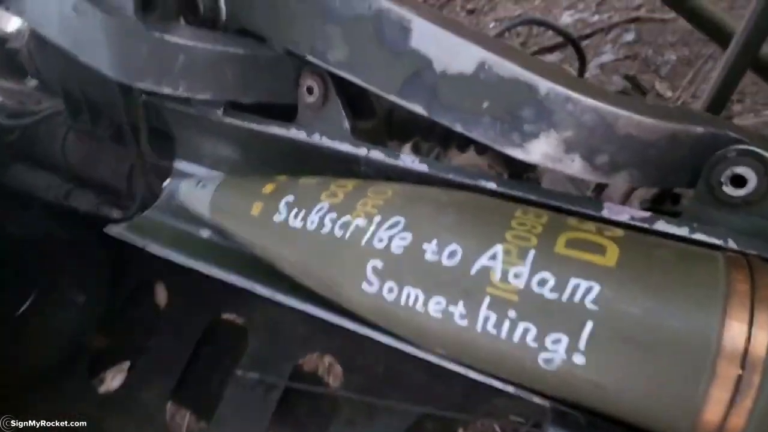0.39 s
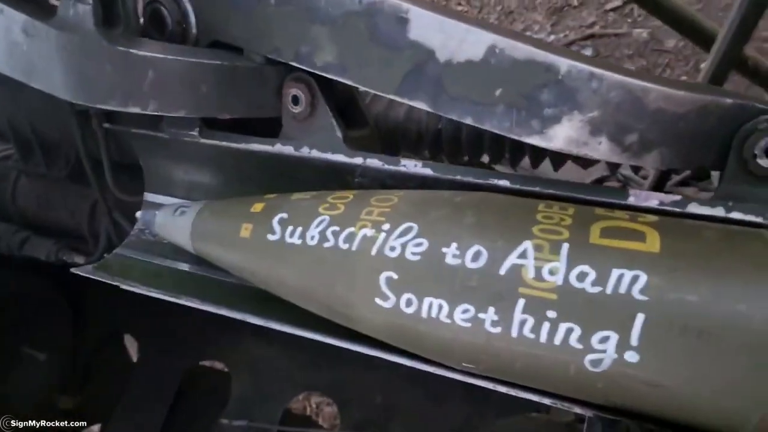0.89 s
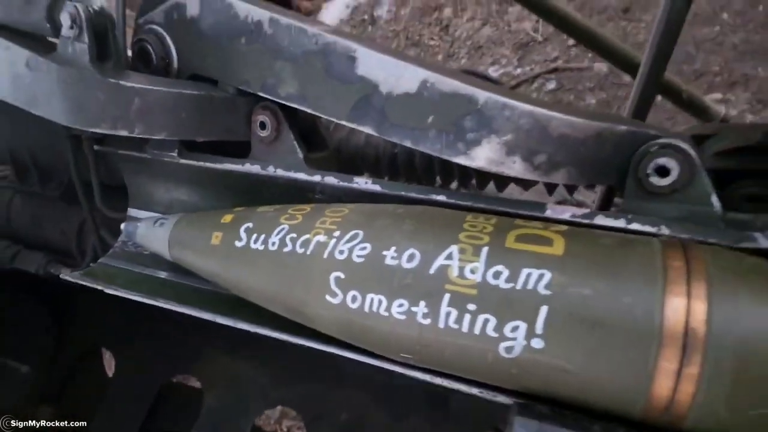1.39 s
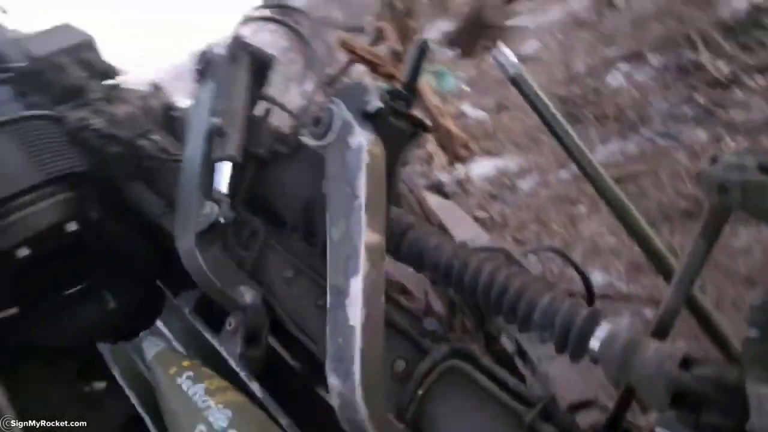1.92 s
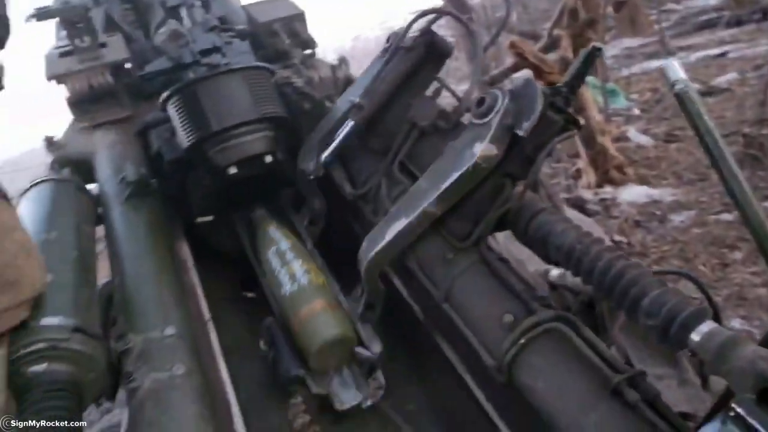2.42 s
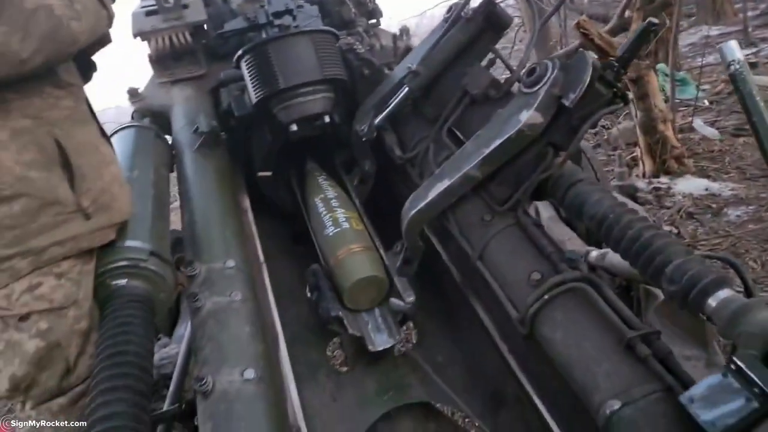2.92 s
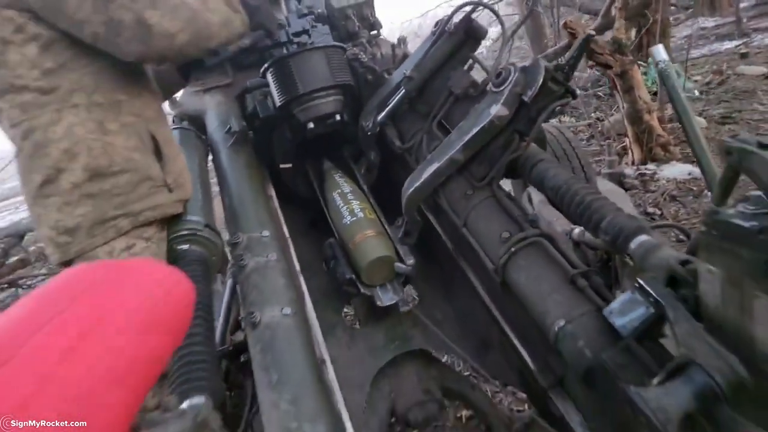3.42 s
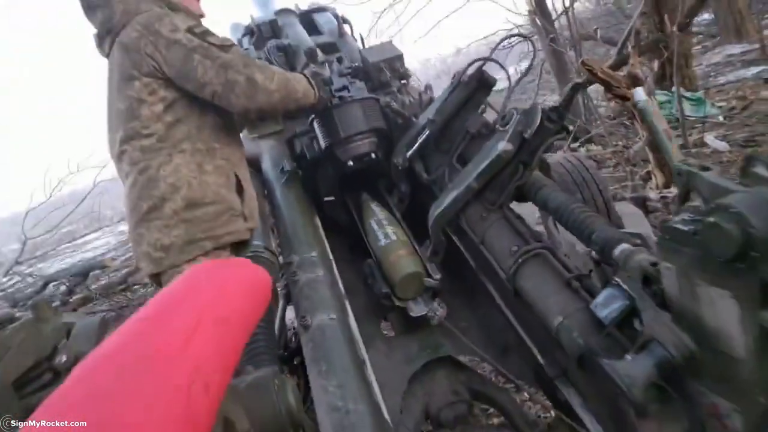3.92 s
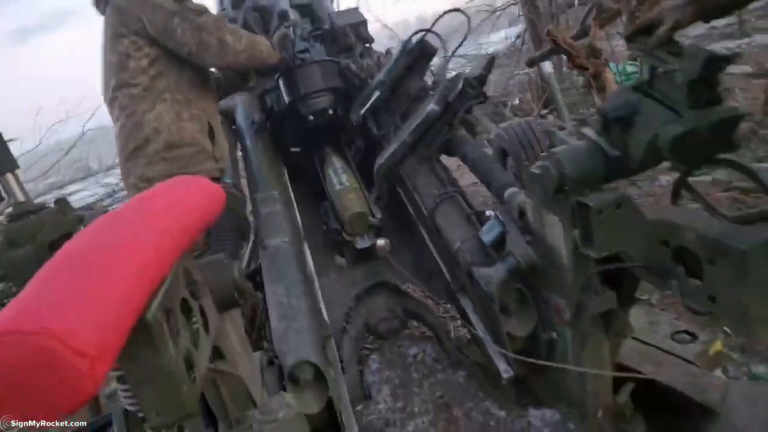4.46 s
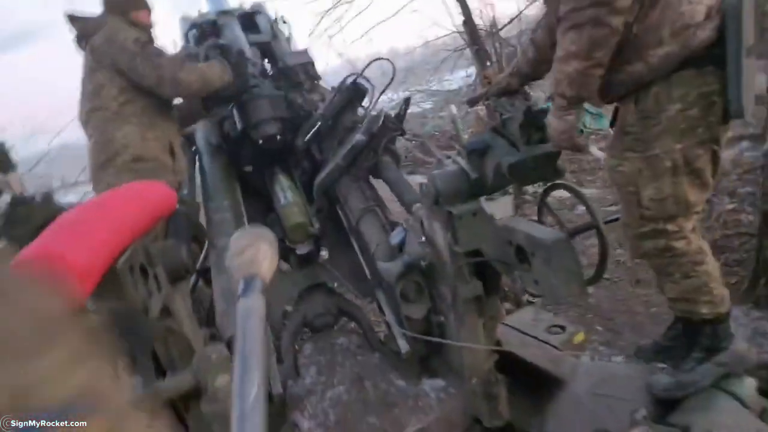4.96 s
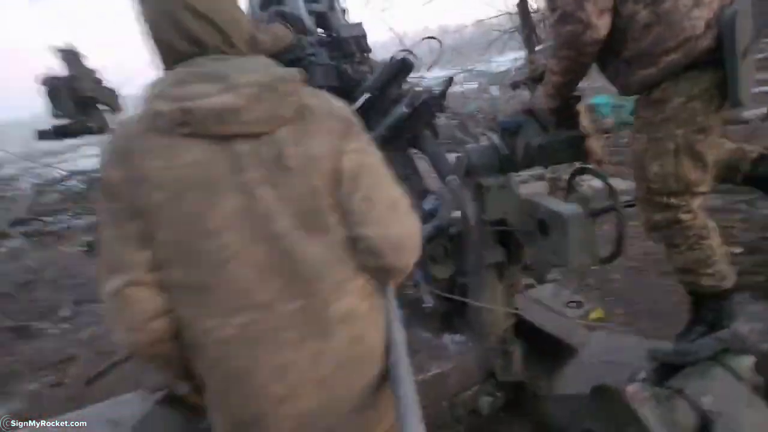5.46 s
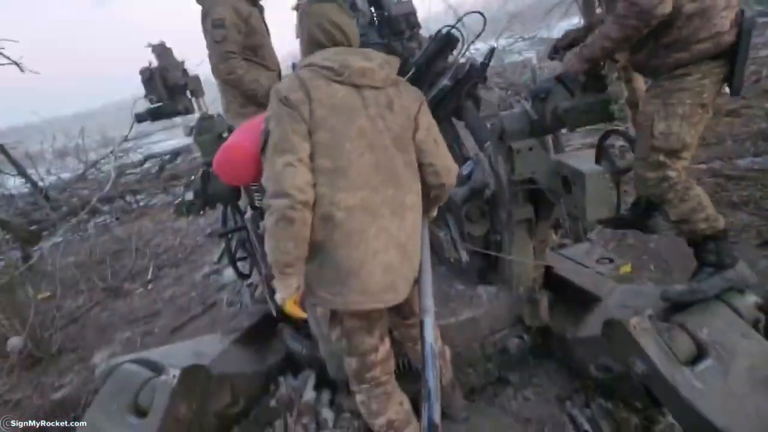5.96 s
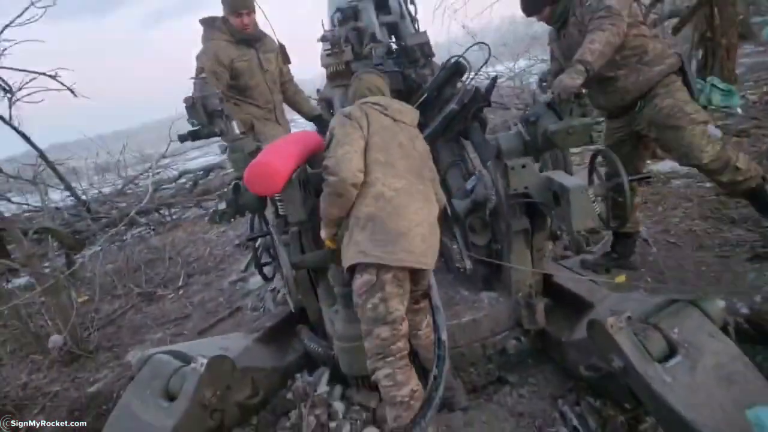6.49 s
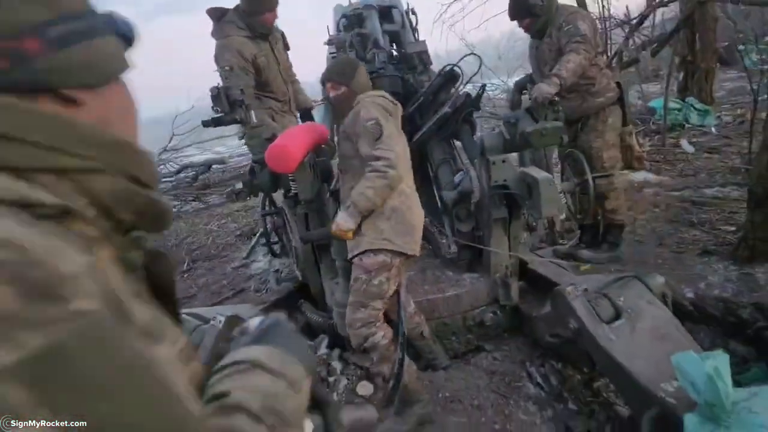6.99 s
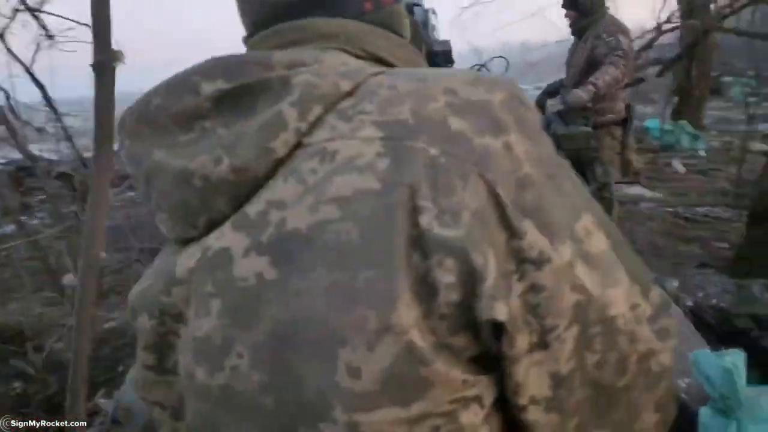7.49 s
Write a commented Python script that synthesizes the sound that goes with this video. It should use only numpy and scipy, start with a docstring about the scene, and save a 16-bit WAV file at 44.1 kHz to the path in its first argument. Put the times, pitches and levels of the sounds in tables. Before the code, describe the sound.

Close outdoor handling of a heavy gun: hollow metal clatter and scraping burst in, then boots crunch, dull knocks land and one late clank rings.

```python
"""Blows ring the steel tray of a field gun outdoors and echo along its open barrel as a heavy shell and gun
parts are handled; parts scrape between blows. The steel is a sum of decaying modes driven by noisy pushes.
Boots crunch on frozen litter (resonant bursts of noise), twigs and a hard tick click dryly (filtered pulses),
dull thumps reach the hand-held phone, a metre or two away, through the hand (sagging sines), and a sleeve
rubs on canvas. Light wind and rustle lie underneath as coloured noise of wavering level."""
import sys
import numpy as np
from scipy import signal
from scipy.fft import rfft, irfft, next_fast_len
from scipy.io import wavfile
from scipy.ndimage import uniform_filter1d

SR = 44100
rng = np.random.default_rng(int(sys.argv[2]) if len(sys.argv) > 2 else 0)


def ratio(d):
    """dB to gain"""
    e = np.asarray(d, float) / 20
    return 10 ** e


def unload_audio(sound):
    """Save the sound as a 16-bit wav file, at the path given as the first command line argument."""
    columns = np.transpose(np.atleast_2d(sound))
    # keep every value between -1 and 1, then stretch to whole-number steps
    steps = np.round(np.clip(columns, -1, 1) * 32767)
    wavfile.write(sys.argv[1], SR, steps.astype(np.int16))


N = 336114

# Modes of tray and shell. Each row: nominal frequency in Hz, relative level in dB, t60 in seconds.
STEEL_MODES = [(373.5, -2.5, 0.16), (455.3, -3.5, 0.12), (505, 2.5, 0.029), (613, 0, 0.07),
               (690, 0.5, 0.06), (739.4, 6, 0.055), (834, 2, 0.055), (936, 10.5, 0.014),
               (1086, -2.5, 0.043), (1298, 0, 0.083), (1525, -5, .07), (1660, -4.5, 0.059),
               (1885, -4.5, 0.072), (2076, -6, 0.14), (2354, -4, .07), (2805, -8, 0.045), (3090, -6, 0.14),
               (3360, -12, 0.088)]
# Modes of the heavy carriage. Each row: nominal frequency in Hz, relative level in dB, t60 in seconds.
CARRIAGE_MODES = [(139, -0.5, 0.15), (182, -3, 0.16), (249.7, -3, 0.084)]
# Spectrum of a crack, the middle band of a burst. Each row: frequency in Hz, relative level in dB per Hz.
CRACK_COLOUR = [(800, -10), (1300, 4.5), (1900, 3.5), (2600, -2), (3100, 1), (4000, -9.5), (5500, -56.5)]
# Spectrum of a sizzle, the treble band of a burst. Each row: frequency in Hz, relative level in dB per Hz.
SIZZLE_COLOUR = [(3000, -14), (4500, -7), (6900, -6), (7600, -6.5), (8600, -9.5), (9900, -17.5),
                 (11500, -12), (15200, -8.5), (16500, -33.5)]


def colour(x, points):
    """Linear filtering: each frequency is scaled by a gain drawn through (Hz, dB) points."""
    size = next_fast_len(x.shape[-1])
    hz, db = np.transpose(points)
    bin_hz = np.arange(size // 2 + 1) * SR / size
    gain = ratio(np.interp(np.log(bin_hz + 1), np.log(hz), db))
    return irfft(rfft(x, size) * gain, size)[..., :x.shape[-1]]


def noise(points):
    """Coloured noise: two uncorrelated signals, mid and side, of joint rms 1."""
    x = colour(rng.standard_normal((2, N)), points)
    return x / x.std()


def walk(rate):
    """Slow random modulation: levels held for 1 / rate seconds and slewed twice, with a spread of 1."""
    hold = int(SR / rate)
    steps = np.repeat(rng.standard_normal(N // hold + 1), hold)
    x = uniform_filter1d(uniform_filter1d(steps, hold), hold)[:N]
    return x / x.std()


def grit(scatter_db, rate):
    """Uneven contact: many small slips make the level jump."""
    return ratio(scatter_db * walk(rate))


def curve(rows):
    """Linear interpolation in time: the columns of a table, one value per sample."""
    s, *columns = np.transpose(rows)
    return [np.interp(np.arange(N) / SR, s, column) for column in columns]


def during(rows):
    """Time gating: 1 while a table lasts, with soft ends."""
    gate = np.interp(np.arange(N) / SR, [rows[0][0], rows[-1][0]], [1, 1], 0, 0)
    return uniform_filter1d(gate, SR // 50)


def fade(t60, rise_s=0.00024):
    """Exponential decay after a quick rise, a third of a second long."""
    t = np.arange(SR // 3) / SR
    return (1 - np.exp(-t / rise_s)) * np.exp(-np.log(1000) * t / max(t60, 1e-3))


def add(out, s, x):
    """Superposition: x is mixed into out from time s."""
    i = int(s * SR)
    n = min(x.shape[-1], N - i)
    out[..., i:i + n] += x[..., :n]


def ring(modes, push, spot_hz=650.0, spot_db=0., detune=0.):
    """Modal response to a push; modes away from the struck spot's pitch lose spot_db per octave."""
    t = np.arange(SR // 6) / SR
    hz, db, t60 = np.transpose(modes)[:, :, None]
    chance = rng.standard_normal((3, len(modes), 1))
    db = db - spot_db * np.abs(np.log2(hz / spot_hz)) + 100 * detune * chance[0]
    hz = hz * (1 + detune * chance[1])  # loose parts load the steel differently every time
    decay = np.exp(-np.log(1000) * t / t60)
    polarity = np.sign(chance[2])
    response = np.sum(polarity * ratio(db) * np.sin(2 * np.pi * hz * t) * decay, axis=0)
    return signal.fftconvolve(push, response[None] / np.abs(response).max(), axes=1)[:, :N]


def air():
    """Turbulence buffets the phone in lumps; cloth friction swishes mid-range and litter rustles above it."""
    # Each row: time in seconds, levels in dB of wind on the phone, cloth swish and fine rustle.
    air_levels = [(0.0, -60, -49, -55.5), (0.53, -46, -57.5, -58), (0.8, -54.5, -62, -63),
                  (1.59, -52.5, -60, -59), (2.0, -41.5, -44, -62.5), (2.45, -53.5, -65.5, -63.5),
                  (2.85, -49, -51, -64), (3.2, -49, -75, -78.5), (3.5, -44, -57.5, -60.5),
                  (3.95, -65.5, -65, -69), (4.33, -43.5, -62, -67.5), (4.6, -56.5, -59.5, -61),
                  (4.8, -41.5, -56.5, -58.5), (5.2, -49.5, -54.5, -58), (5.58, -50.5, -59, -59.5),
                  (5.8, -44.5, -54, -55.5), (6.7, -48, -54.5, -54), (7.15, -50.5, -53.5, -55),
                  (7.62, -45, -58, -59.5)]
    # Spectrum of the wind. Each row: frequency in Hz, relative level in dB per Hz.
    wind_colour = [(18, -25), (30, -1), (80, 4), (150, -1.5), (300, -16.5), (600, -19), (1200, -62.5)]
    # Spectrum of cloth and litter before it is split. Each row: frequency in Hz, relative level in dB per Hz.
    rustle_colour = [(150, -4), (300, 3), (900, -4.5), (1500, -7), (2500, -10), (4000, -16.5), (6500, -15),
                     (8500, -17.5), (10500, -34), (11700, -25.5), (15200, -24), (16500, -37.5)]
    wind_db, swish_db, rustle_db = curve(air_levels)

    # single twigs and folds stand out of the hiss, about 20 a second
    ticks = (rng.random(N) < 20 / SR) * rng.exponential(0.7, N)
    prickle = 1 + signal.fftconvolve(ticks, fade(0.03)[:SR // 10])[:N]
    hiss = noise(rustle_colour) * prickle * ratio(1.0 * walk(31))

    low = colour(hiss, [(500, -7.0), (1200, -32.0)])
    high = colour(hiss, [(2500, -17), (4000, 5.0)])
    middle = hiss - low - high
    swish = low * ratio(1.6 * walk(16)) + middle * ratio(2.2 * walk(9))
    swish = swish / swish.std() * ratio(swish_db)
    wind = noise(wind_colour) * ratio(wind_db + 3.1 * walk(9))
    rustle = high / high.std() * ratio(rustle_db + 1.0 * walk(14))
    return wind + swish + rustle


def crunches():
    """Brittle fracture: grains break in a short dense burst; each heap or kit part has chance resonances."""
    # Boots and kit on frozen litter. Each row: start in seconds, burst level in dB, body level in dB against
    # the burst, body pitch in Hz, sizzle level in dB against the burst.
    footfalls = [(0.02, -24.5, -12, 960, 3), (0.0543, -18, -6, 530, 1.5), (0.2374, -25, -5.5, 570, -7),
                 (0.35, -34, -16, 1300, -6), (0.4808, -53.5, 16, 485, -13), (0.5318, -43, 8.5, 650, -4.5),
                 (0.7, -44.5, 7, 680, 1.5), (1.1208, -47, 4.5, 806, -11), (1.162, -46, -23, 720, 2),
                 (1.271, -53, 13.5, 394, 10), (1.318, -41, -7, 850, -30), (1.455, -91, 33.5, 590, -58),
                 (1.612, -58.5, 22, 395, -24.5), (3.6064, -25, -0.5, 920, 5), (3.7688, -48, 19.5, 386, -33),
                 (3.854, -40, 7, 930, 2), (4.1306, -40, 3, 1080, -4), (4.16, -42.5, 12.5, 930, 0),
                 (4.196, -46.5, 11, 750, -1), (4.2469, -39.5, 11.5, 970, 2), (4.3833, -40.5, 7.5, 477, -5),
                 (4.5592, -53.5, 15, 624, -14), (4.6633, -33.5, 4, 720, 7), (4.682, -35, 4, 600, 7.5),
                 (4.7061, -23, 1.5, 650, 3.5), (4.718, -34.5, 11.5, 710, 6), (5.198, -43, 9, 453, -14),
                 (5.3621, -33.5, 10, 247, 5.5), (5.397, -42.5, 6.5, 544, -31), (5.7995, -53.5, 18, 420, 3),
                 (6.169, -50, 21, 322, -14), (6.315, -27.5, 7.5, 460, -34), (6.8943, -45, 13, 242, -34)]
    soft_t60_s, soft_db, shortening = 0.12, -43.5, 0.2747  # t60 at the soft level; dB of t60 lost per dB above
    out, uneven = np.zeros((2, N)), grit(1.4, 400)
    crack, sizzle = noise(CRACK_COLOUR), noise(SIZZLE_COLOUR)
    for s, db, body_db, body_hz, sizzle_db in footfalls:
        i = int(s * SR)
        span = slice(i, min(i + SR // 4, N))
        t60 = soft_t60_s * ratio(shortening * (soft_db - db))  # a harder crunch is shorter
        envelope = fade(t60) + ratio(-13) * fade(2.8 * t60) + 0.7 * fade(0.015, rise_s=0.001)
        burst = ratio(db - 8.0) * envelope[:span.stop - i] * uneven[span]

        white = rng.standard_normal((2, len(burst)))
        b, a = signal.iirpeak(body_hz, 1.5, fs=SR)
        body = signal.lfilter(b, a, signal.lfilter(b, a, white))
        body = ratio(body_db) * body / body.std()
        grains = burst * (body + crack[:, span] + ratio(sizzle_db) * sizzle[:, span])

        # a short random impulse response gives the chance resonances
        heap = 0.14 * rng.standard_normal(SR // 50) * fade(0.015)[:SR // 50]
        heap[0] = 1
        add(out, s, signal.fftconvolve(grains, heap[None] / np.linalg.norm(heap), axes=1))
    return out


def thumps():
    """Damped oscillation: a soft knock sags in pitch, a little to one side, with a dull scuff on top."""
    # Each row: start in seconds, level in dB, settled pitch in Hz.
    knocks = [(0.057, -23, 136), (0.246, -28, 135), (0.341, -25, 116), (0.376, -29.5, 120),
              (0.552, -30.5, 183), (1.275, -32, 115), (1.61, -17, 130), (1.647, -18, 115.6),
              (3.303, -18.5, 140), (3.608, -29.5, 146), (3.771, -28.5, 225), (4.249, -24, 57),
              (4.383, -32.5, 72), (4.582, -27, 88), (4.779, -25.5, 78.1), (4.946, -21, 83),
              (5.211, -21.5, 105), (5.352, -20, 113), (5.385, -18.5, 83), (5.732, -31, 132),
              (5.833, -23, 142), (5.94, -19, 50.3), (6.015, -19, 91), (6.163, -18, 120), (6.24, -27.5, 281),
              (6.269, -20.5, 138), (6.896, -19, 130)]
    out, scuff, t = np.zeros((2, N)), np.zeros(N), np.arange(SR // 3) / SR
    for s, db, hz in knocks:
        phase = 2 * np.pi * hz * (t + 0.0025 * (1 - np.exp(-t / 0.0016)))
        add(out, s, ratio(db) * np.sin(phase) * fade(0.063, rise_s=0.0046))  # equal in mid and side
        add(scuff, s, ratio(db - 17.5) * fade(0.11, rise_s=0.00082))
    return out + scuff * noise([(90, -23.0), (200, 10.0), (450, -1.5), (900, -42)])


def clicks():
    """Impulsive excitation of a broad resonance: one dry click with a few milliseconds of splinters."""
    # Single dry clicks: twigs and a hard tick among the blows.
    # Each row: start in seconds, peak level in dB, pitch in Hz.
    dry_clicks = [(0.1361, -34, 1900), (0.634, -34, 1960), (1.1625, -29, 11000), (1.272, -35, 11000),
                  (1.574, -30, 8600), (1.828, -8, 7500), (3.8038, -42.5, 1630), (3.823, -38.5, 990),
                  (4.3055, -33.5, 2680), (4.559, -42, 620), (5.317, -33.5, 1320), (5.8174, -35, 950),
                  (6.4874, -31, 2840), (6.59, -33.5, 1170), (7.0235, -24.5, 1470), (7.0988, -75, 1320),
                  (7.185, -34.5, 1400)]
    out = np.zeros((2, N))
    for s, db, hz in dry_clicks:
        push = 0.8 * rng.standard_normal((2, SR // 20)) * fade(0.0027)[:SR // 20]
        push[:, 0] += 1
        b, a = signal.iirpeak(hz, 0.91, fs=SR)
        click = signal.lfilter(b, a, signal.lfilter(b, a, push))
        add(out, s, ratio(db) * click / np.abs(click[0]).max())
    return out


def sleeve():
    """Friction noise: a sleeve of rough cloth drags over canvas in uneven patches."""
    # One list per spell of rubbing. Each row: time in seconds, level in dB.
    spells = [
        [(0.56, -63.5), (0.72, -47), (0.78, -78)],
        [(4.8, -61), (4.92, -52), (5.06, -62.5), (5.17, -49), (5.27, -56), (5.44, -56.5), (5.6, -64.5),
         (5.72, -56), (6.1, -63), (6.5, -53.5), (6.95, -59), (7.62, -65.5)],
    ]
    # Spectrum of the rub. Each row: frequency in Hz, relative level in dB per Hz.
    cloth_colour = [(700, -13), (1200, 1), (1700, 1), (2300, -4), (4500, -20.5)]
    drag = noise(cloth_colour) * grit(1.3, 25) * grit(1.9, 120)
    level = sum(during(rows) * ratio(curve(rows)[0]) for rows in spells)
    return level * drag / drag.std()


def scrape():
    """Stick-slip friction: chatter keeps tray and carriage singing while parts slide."""
    # One list per spell of sliding and rattling. Each row: time in seconds, ring level and hiss level in dB.
    slides = [
        [(1.68, -67.5, -58), (1.73, -45.5, -32.5), (1.81, -42, -41.5), (1.898, -37, -48), (1.978, -39, -50),
         (2.18, -41.5, -43.5), (2.4, -56.5, -78), (2.46, -62.5, -98)],
        [(2.64, -55.5, -19), (2.66, -28, -41), (2.79, -36, -46), (2.825, -45, -60), (3.0, -38, -55),
         (3.12, -56, -79), (3.19, -44.5, -79), (3.28, -55.5, -60.5), (3.33, -31, -45), (3.42, -43, -58),
         (3.56, -81, -88)],
        [(6.62, -47.5, -49), (6.68, -35.5, -50), (6.82, -51, -79)],
    ]
    slips = grit(4.0, 150)
    rub = ring(STEEL_MODES, rng.standard_normal((2, N)) * slips, spot_db=9.0)
    jolts = grit(3.5, 50)
    carriage = ring(CARRIAGE_MODES, rng.standard_normal((2, N)) * jolts)
    hiss = (noise(SIZZLE_COLOUR) + 0.29 * noise(CRACK_COLOUR)) * grit(4.6, 32)
    out = 0
    for rows in slides:
        ring_db, hiss_db = curve(rows)
        singing = ratio(ring_db) * rub / rub.std()
        rumble = ratio(ring_db - 1.5) * carriage / carriage.std()
        out = out + during(rows) * (singing + rumble + ratio(hiss_db) * hiss)
    return out


def barrel(x, s):
    """Air-column echo: sound runs up the open tube and back, narrower and weaker on every round."""
    # The round trip grows longer later on. Each row: time in seconds, round trip in seconds.
    round_trips = [(2.0, 0.04), (3.4, 0.037), (6.7, .044)]
    tube_hz, width_hz, round_db = 740, 200, -9
    lag = int(np.interp(s, *np.transpose(round_trips)) * SR)
    x, out = np.pad(x, ((0, 0), (0, 3 * lag))), 0
    b, a = signal.iirpeak(tube_hz, tube_hz / width_hz, fs=SR)
    for turn in range(3):
        x = signal.lfilter(b, a, np.roll(x, lag, axis=1))
        out = out + ratio(round_db * turn) * x
    return out


def blows():
    """Impact excitation: a sharp push plus chatter rings the steel; a crack on top rings the high modes."""
    # Steel on steel. Each row: start in seconds, ring level in dB, pitch of the struck spot in Hz,
    # crack level and sizzle level in dB against the ring.
    strikes = [(1.72, -24.5, 616, -0.5, -3), (1.742, -11.5, 771, -5.5, -18.5), (1.76, -1, 860, -13, -27.5),
               (1.769, -3, 700, -15, -27), (1.782, -4, 762, -10, -24), (1.788, -9, 880, -17, -30.5),
               (1.828, -8.5, 614, -16, -3.5), (1.852, -14, 638, -5, -20.5), (1.882, -12.5, 591, -1, -25.5),
               (1.899, -0.5, 690, -13, -22.5), (1.916, -15.5, 699, -8, -3.5), (1.977, -28, 424, -0.5, -2),
               (1.995, -26, 720, -26.5, -26), (2.023, -11.5, 793, -19, -28.5),
               (2.074, 0.5, 732, -17.5, -20), (2.177, -24.5, 725, -13, -20.5),
               (2.245, -35, 670, -19, -33.5), (2.286, -25.5, 383, -31.5, -42),
               (2.334, -31, 610, -23.5, -28), (2.392, -34, 580, -21.5, -24.5), (2.647, -4.5, 802, -8, -8.5),
               (2.662, -5, 671, -8.5, -10.5), (2.746, -13.5, 756, -22.5, -32.5),
               (2.762, -16, 1070, -12.5, -20), (2.831, -25.5, 418, -7.5, -23), (2.853, -20, 595, -27, -43),
               (2.883, -10, 897, -31.5, -32.5), (2.968, -14.5, 730, -19, -40),
               (2.997, -26, 345, -34.5, -24), (3.171, -36, 716, -41, -43), (3.199, -32.5, 450, -30, -33.5),
               (3.304, -15, 667, -10.5, 0), (3.342, -21.5, 635, -10.5, -37.5),
               (3.391, -21, 665, -11.5, -32), (6.634, -24, 434, 2, -15), (6.677, -15, 555, -18.5, -33.5),
               (6.685, -3.5, 603, -14, -21.5)]
    # Resonances of small hard parts. Each row: frequency in Hz, width in Hz, level in dB against the bursts.
    small_parts = [(5550, 60, -24), (7500, 45, -22), (13720, 22, -17)]
    into_barrel_db, into_carriage_db = -4, -25  # share of every blow that enters the tube, shakes the carriage
    steel, crack, sizzle = np.zeros((2, N)), np.zeros(N), np.zeros(N)
    for s, db, spot_hz, crack_db, sizzle_db in strikes:
        chatter = ratio(-22) * rng.standard_normal((2, SR // 14)) * fade(0.04, rise_s=0.001)[:SR // 14]
        chatter[:, 0] += 0.91 * np.array([1, rng.choice([-1, 1])])  # the push, on a random side

        body = ring(STEEL_MODES, chatter, spot_hz, spot_db=14.0, detune=0.012)
        body = ratio(db) * body / np.abs(body[0]).max()
        high_modes = ring(STEEL_MODES[-9:], chatter, detune=0.016)
        add(steel, s, body + ratio(db + crack_db) * high_modes)
        add(steel, s, ratio(into_barrel_db) * barrel(body, s))
        add(steel, s, ratio(db + into_carriage_db) * ring(CARRIAGE_MODES, chatter, detune=0.12))

        # the litter and frame around scatter a short tail
        burst = 1.2 * fade(0.034) + fade(0.12) + ratio(-11.5) * fade(0.27)
        add(crack, s, ratio(db + crack_db - 13.5) * burst)
        add(sizzle, s, ratio(db + sizzle_db - 7.5) * burst)

    bright = grit(2.5, 200) * (crack * noise(CRACK_COLOUR) + sizzle * noise(SIZZLE_COLOUR))
    for hz, width_hz, part_db in small_parts:  # they sing on after the big blows
        b, a = signal.iirpeak(hz, hz / width_hz, fs=SR)
        part = signal.lfilter(b, a, bright + 1e-18)
        steel += ratio(part_db) * part * bright.std() / part.std()
    return steel + bright


def scene():
    """Superposition of all sources as mid and side, then sum and difference give left and right."""
    # The two microphones agree most from 110 to 400 Hz and differ most from 1.3 to 8 kHz.
    # Each row: frequency in Hz, gain of the side signal in dB.
    side_share = [(60, -7.5), (110, -24), (200, -14), (380, -12.5), (700, -8), (1290, -0.5), (2380, -1),
                  (4400, 0), (8120, -1.5), (15000, -8.5)]
    # steel parts radiate no deep bass
    steel = colour(blows() + scrape(), [(40, -42.0), (110, 6.0), (16000, -8.0)])
    mid, side = steel + crunches() + clicks() + thumps() + sleeve() + air()
    side = colour(side, side_share)
    return np.array([mid + side, mid - side])


def band_limit(x):
    """A steep low-pass at the top of the band."""
    return signal.sosfilt(signal.butter(12, 16820, fs=SR, output="sos"), x)


def record(dry):
    """Saturation and low-pass filtering: a soft limit keeps the loudest peaks below full scale; the top is cut."""
    limited = 0.95 * np.tanh(dry / 0.95)
    mix = colour(limited, [(15900, 0.0), (16600, -43.0)])
    return band_limit(mix)


dry = scene()
out = record(dry)
unload_audio(out)
```